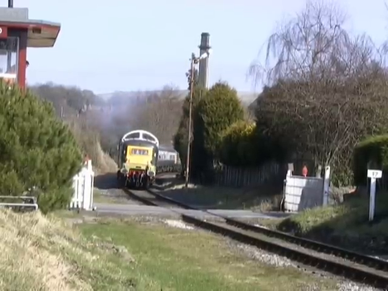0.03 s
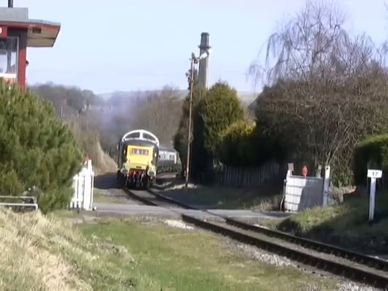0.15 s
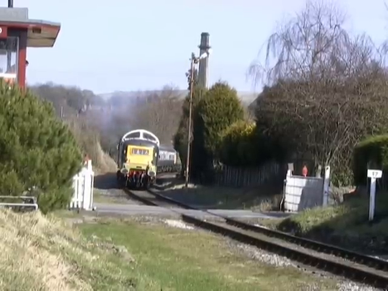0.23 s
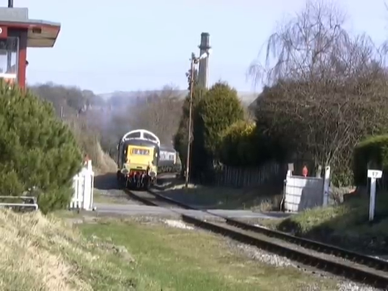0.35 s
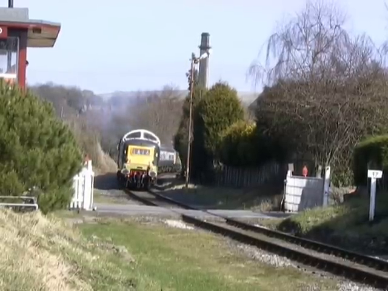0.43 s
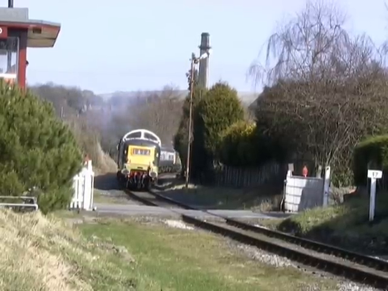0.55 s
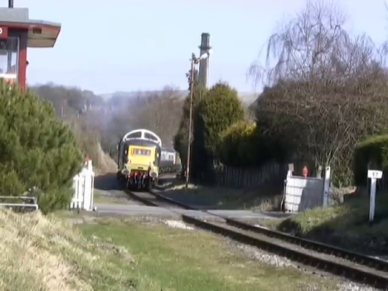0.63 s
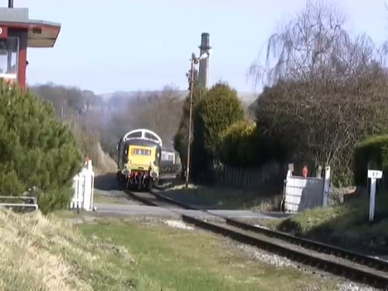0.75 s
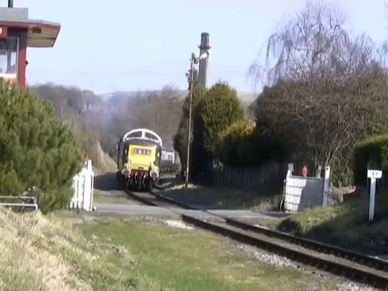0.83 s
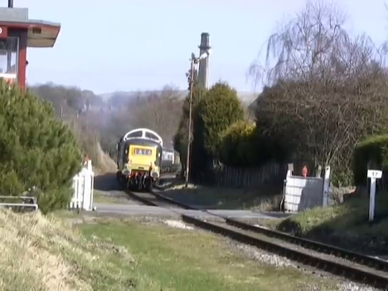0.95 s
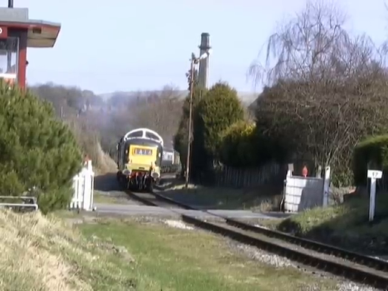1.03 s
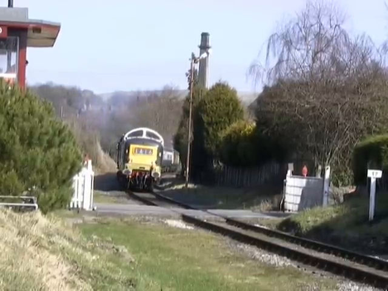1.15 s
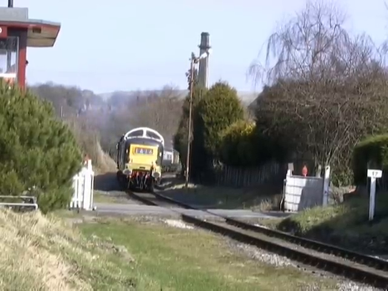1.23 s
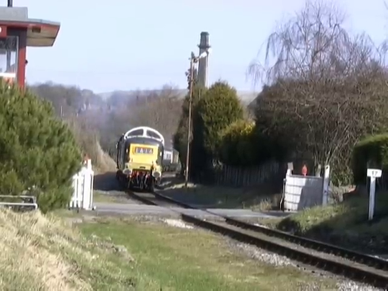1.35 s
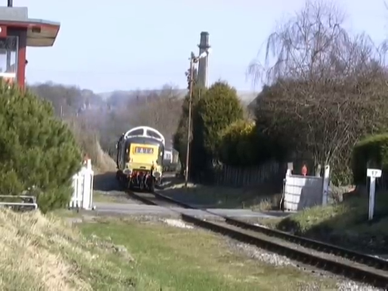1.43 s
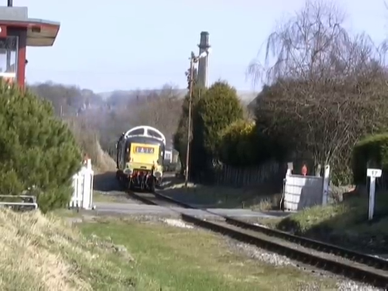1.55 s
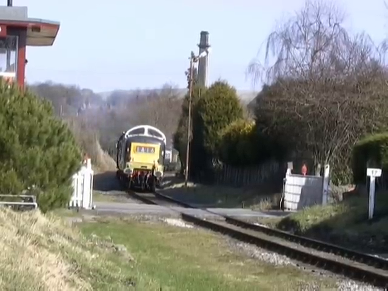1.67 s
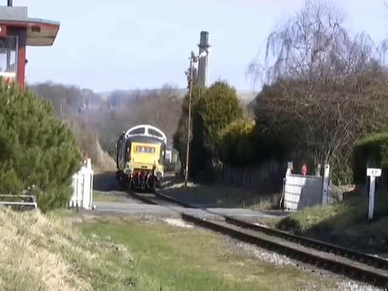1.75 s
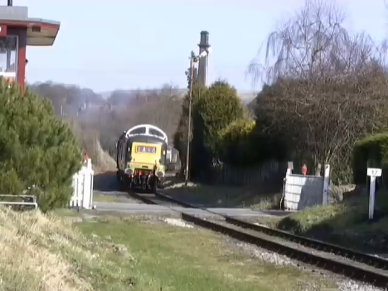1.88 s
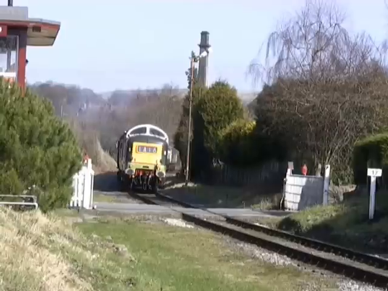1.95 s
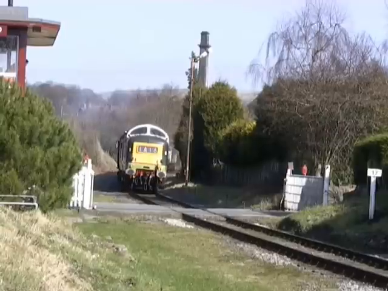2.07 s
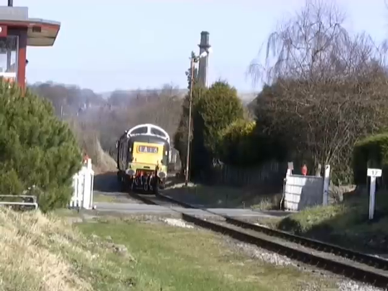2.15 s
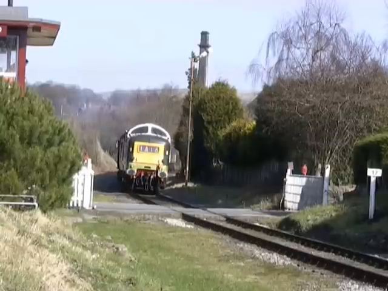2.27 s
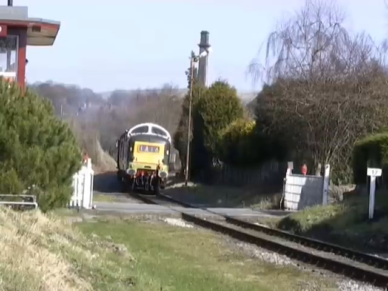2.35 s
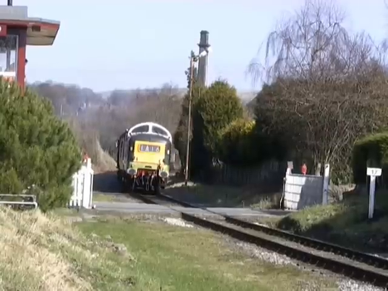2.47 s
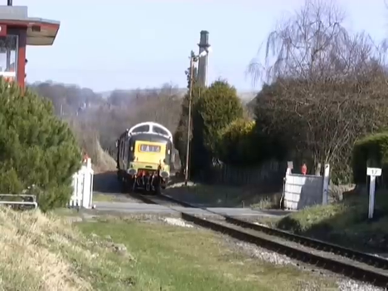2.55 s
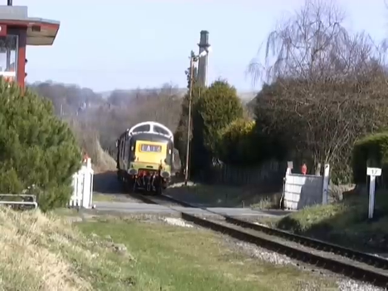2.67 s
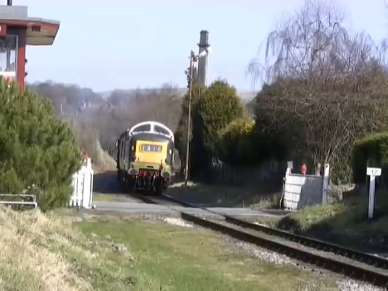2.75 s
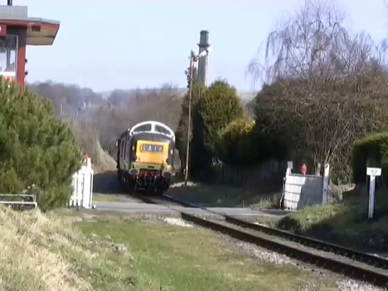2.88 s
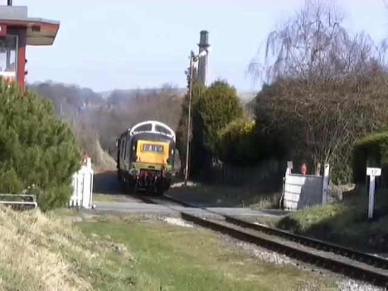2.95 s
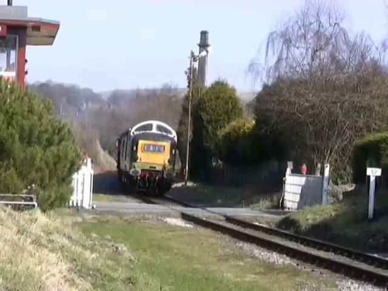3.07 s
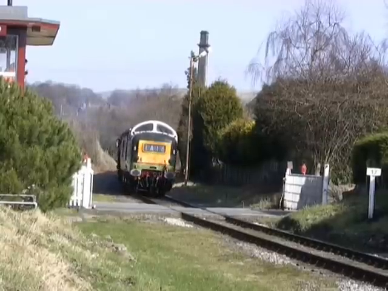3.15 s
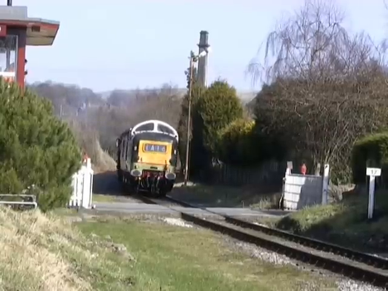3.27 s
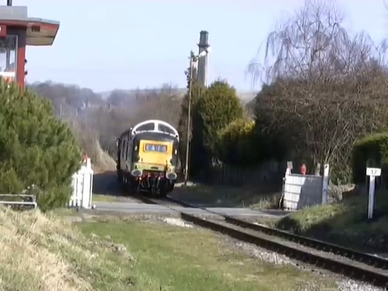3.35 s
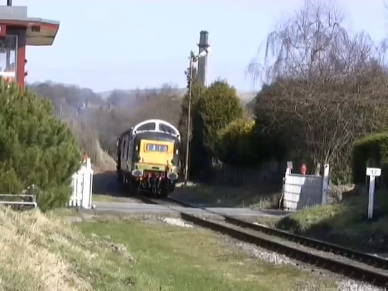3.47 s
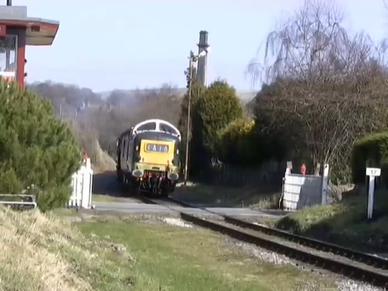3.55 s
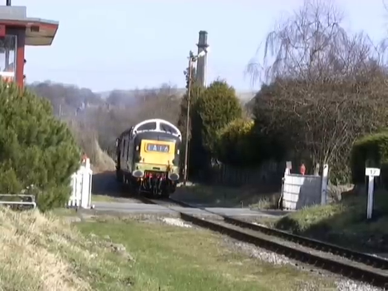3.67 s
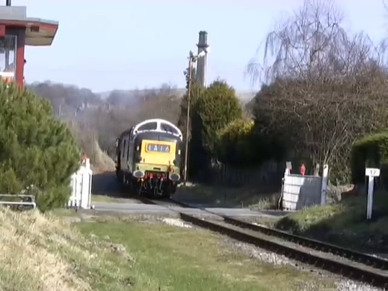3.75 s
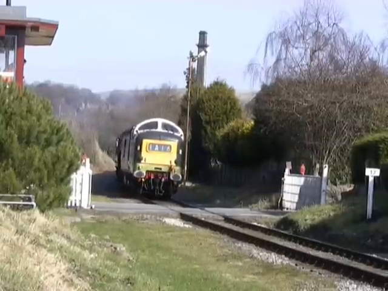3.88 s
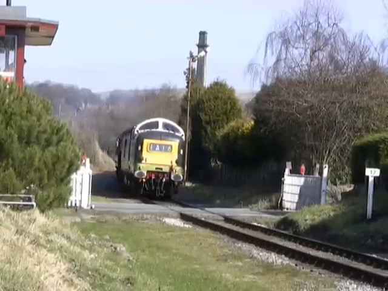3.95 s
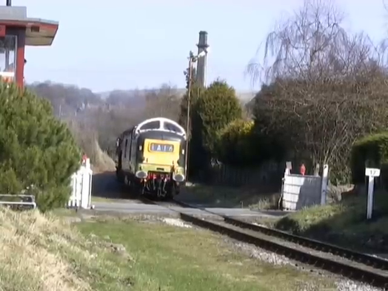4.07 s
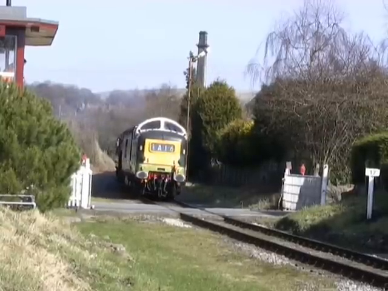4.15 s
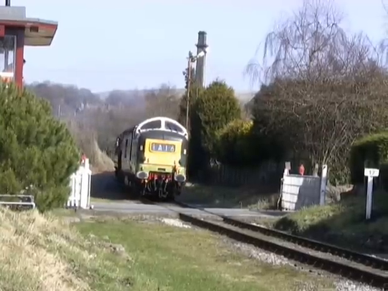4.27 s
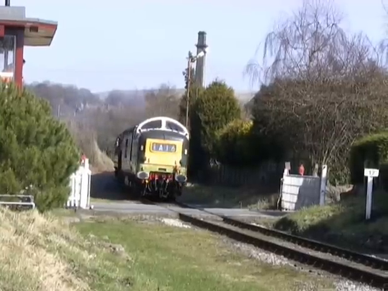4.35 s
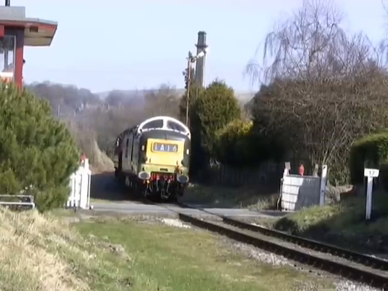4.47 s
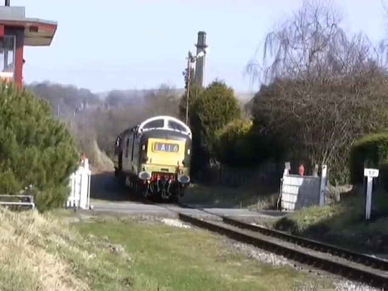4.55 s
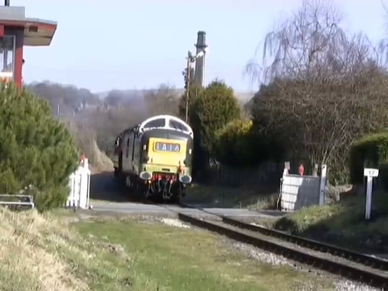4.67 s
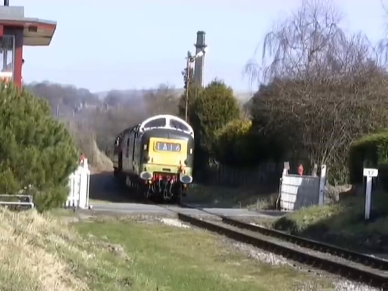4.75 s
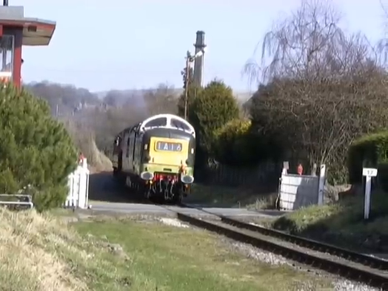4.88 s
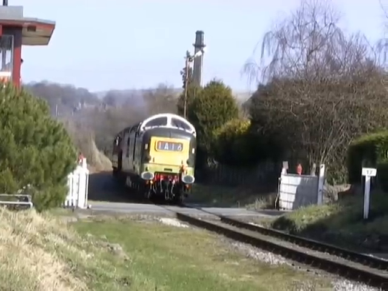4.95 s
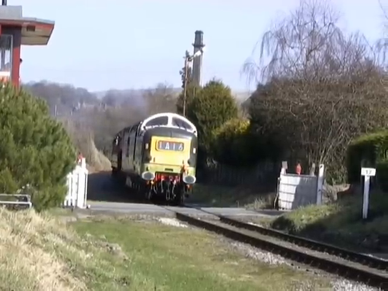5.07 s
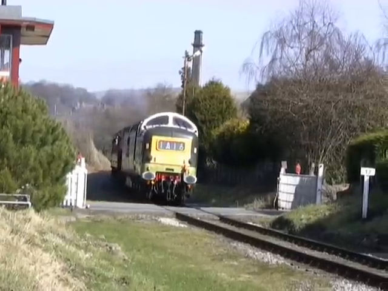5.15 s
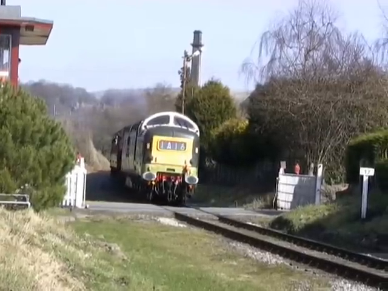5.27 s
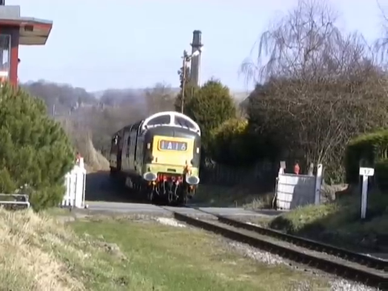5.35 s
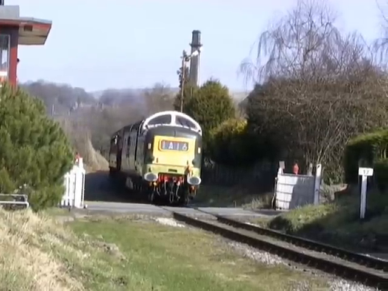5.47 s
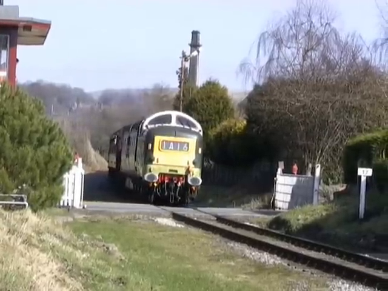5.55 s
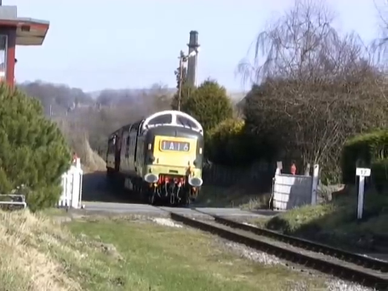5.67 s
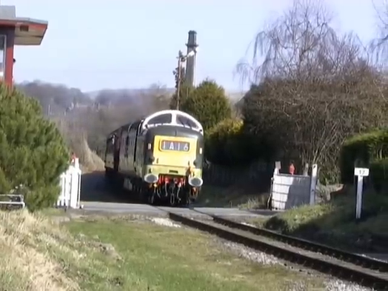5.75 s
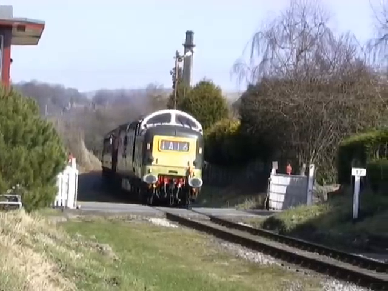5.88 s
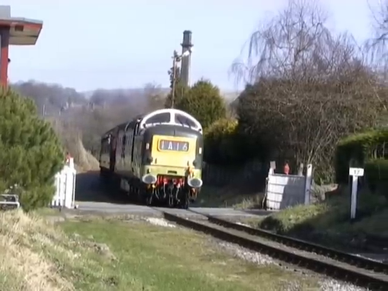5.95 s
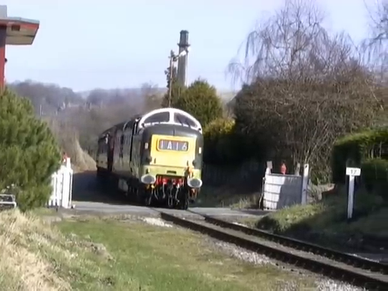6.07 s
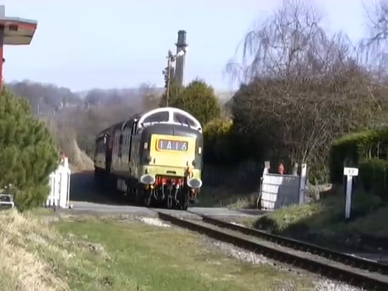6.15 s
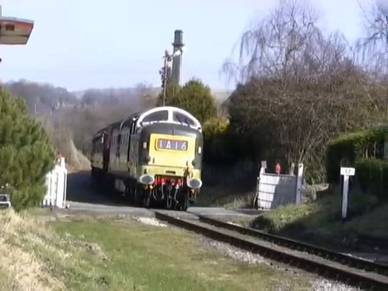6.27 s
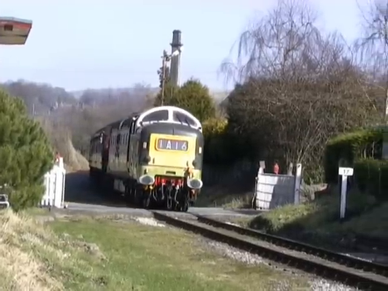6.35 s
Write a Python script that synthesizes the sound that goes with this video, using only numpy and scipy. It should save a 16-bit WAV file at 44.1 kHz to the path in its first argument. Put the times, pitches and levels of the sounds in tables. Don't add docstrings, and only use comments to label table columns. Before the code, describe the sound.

A powerful diesel engine is already running in the distance, revving up gently, then holding steady. Its deep pulsing hum, thick exhaust rumble and high mechanical whine come closer along the track, leaning slightly left. The second half grows much louder and clearer, with short puffs of bright hiss and small dips from moving air. A trackside camera adds faint hiss, high tones and dry little clicks.

```python
import sys
import numpy as np
from scipy import signal
from scipy.fft import rfft, irfft
from scipy.io import wavfile
from scipy.ndimage import uniform_filter1d

SR = 44100
rng = np.random.default_rng(int(sys.argv[2]) if len(sys.argv) > 2 else 0)


def magnitude_from_level(level_db):
    exponent = np.asarray(level_db, float) / 20
    return 10 ** exponent


def to_wav(s):
    ch = np.atleast_2d(s).T
    pcm = np.round(np.clip(ch, -1, 1) * 32767)
    wavfile.write(sys.argv[1], SR, pcm.astype(np.int16))


N = 283122
T = np.arange(N) / SR
BLOWER_RATIO = 9.89 / 3

# time in seconds, nearness in dB, effort in dB.
APPROACH = [(0., .1, 4), (.3, 0.3, 5), (.8, 0.8, 5), (1.4, -1.45, 5), (2.05, -1, 1.4), (2.9, 1.35, 0.3),
            (3.5, 4, -0.5), (4.2, 7, -1.4), (4.8, 9., -0.2), (5.3, 10, 0.5), (6.42, 10.5, 2.2)]
# time in seconds, first crank in Hz, second crank (a hair slower) in Hz.
SPEED = [(0.0, 17.047, 17.032), (0.5, 17.586, 17.494), (1.0, 18.02, 17.923), (1.25, 18.189, 18.081),
         (1.5, 18.283, 18.194), (2.0, 18.357, 18.294), (2.25, 18.295, 18.242), (2.75, 18.118, 18.097),
         (3.1, 18.078, 18.068), (3.5, 18.103, 18.103), (4.0, 18.183, 18.182), (4.5, 18.214, 18.206),
         (5.0, 18.279, 18.249), (5.75, 18.355, 18.324), (6.42, 18.39, 18.36)]


def evened(x):
    return x / np.sqrt(np.mean(x ** 2) + 1e-20)


def columns(rows, t=T):
    s, *values = np.transpose(rows)
    return [np.interp(t, s, v) for v in values]


def read(points, hz):
    f, value = np.transpose(points)
    return np.interp(np.log(hz + 1), np.log(f + 1), value)


def smoothed_noise(shape, across_hz, along_time):
    field = uniform_filter1d(rng.standard_normal(shape), across_hz, axis=0)
    return evened(uniform_filter1d(field, along_time, axis=1))


def drift(per_s, count):
    steps = evened(uniform_filter1d(rng.standard_normal((count, int(30 * per_s) + 8)), 4, axis=1))
    at = np.arange(steps.shape[1]) / (4 * per_s)
    coarse = np.array([np.interp(T[::64], at, row) for row in steps])
    return coarse.repeat(64, axis=1)[:, :N]


def swells(rows, t):
    return sum(db * np.exp(-(2 * (t - s) / length) ** 4) for s, length, db in rows)


def levels(voices):
    t = T[::64]
    near_db, effort_db = columns(APPROACH, t)
    course = [db + a * near_db + b * effort_db + swells(rows, t) for db, a, b, rows in voices]
    return np.array([np.interp(T, t, row) for row in course])


def turns():
    return np.cumsum(columns(SPEED), axis=1) / SR


def throb(wobble_turns=.018):
    throb_voices = [
        (-31.5, 0.83, .01, [(.5, 0.17, -8.5), (1.6, 0.2, 4), (3.7, 0.63, 3.), (6.25, 0.71, -5)]),
        (-28.5, 0.72, -0.36, [(.65, .75, -15), (1.2, .45, -3.5), (2.0, 0.99, 5), (6.0, 0.14, -6)]),
        (-34.5, 0.77, 0.17, [(.5, 0.27, 8.), (2.9, 0.37, 2.5), (5.3, 0.36, -1), (6.4, .6, -7.5)]),
        (-28., .75, 0.071, [(.5, 0.19, -11), (3.2, 0.8, 1.5), (4.65, 0.72, -3)]),
    ]
    flutter_db = np.array([
        [1.5],
        [1.5],
        [.9],
        [.9],
    ])
    null_s = 3.705
    first = turns()[0]
    crank = first - np.interp(null_s, T, first)
    order = np.array([7, 9, 10, 3 * BLOWER_RATIO])[:, None]
    start = np.array([0, 0, 0, .5])[:, None] + rng.random((4, 1)) * [[1], [1], [0], [0]]
    level = magnitude_from_level(levels(throb_voices) + [[0], [0], [1.5], [0]] + flutter_db * drift(9., count=4))
    phase = order * crank + start + wobble_turns * drift(4.6, count=4)
    return np.sqrt(2) * (level * np.sin(2 * np.pi * phase)).sum(0)


def drone(flutter_db=1.5):
    pipe_voices = [
        (-42.5, 0.17, 0.37, [(1.72, .35, 8.5), (2.5, .3, 8), (4.05, .4, -3), (5.3, 0.59, 0), (6.25, .25, -6)]),
        (-45, 0.25, .3, [(.15, 0.91, 4.4), (.8, 0.57, 9.2), (3.58, .15, 9.1), (4.23, .38, 10.6), (5.22, 0.28, 11.5), (5.76, 0.15, 10.), (6.08, 0.31, 14)]),
        (-51, .3, 1.33, [(.95, 0.64, 2.2), (5.8, .3, 6.3)]),
        (-59.5, 1.06, .6, [(.76, .5, 17.8), (1.2, 0.34, 11.5), (1.75, .3, 7.), (5.45, .5, 3.95)]),
    ]
    # crank order, level against its voice in dB.
    clusters = [
        [(25, 0)],
        [(27, 0)],
        [(33, 0), (34, 3), (35, 3), (45, 2), (46, 2), (47, -1)],
        [(55, 3), (56, -3)],
    ]
    crank, out = turns()[1], np.zeros(N)
    for cluster, db in zip(clusters, levels(pipe_voices)):
        k, offset_db = np.transpose(cluster)[:, :, None]
        level = np.sqrt(2) * magnitude_from_level(db + offset_db + flutter_db * drift(2.4, count=len(k)))
        phase = k * crank + rng.random(k.shape)
        out += (level * np.sin(2 * np.pi * phase)).sum(0)
    return out


def resonate(x, hz, width):
    turn = np.exp(2j * np.pi * np.cumsum(hz) / SR)
    r = np.exp(-np.pi * width / SR)
    return 2 * (turn * signal.lfilter([(1 - r) ** 2], [1, -2 * r, r * r], x / turn)).real


def whines(steady=.32):
    whine_voices = [
        (-44.5, 0.72, .01, [(.2, 0.96, -7.), (1.32, 0.28, 6.5), (2.5, 0.6, 4.5), (3.1, 0.36, 4.), (3.95, .5, -7.5), (5.0, .15, 4), (5.79, 0.16, 2.5)]),
        (-54., 1.04, .01, [(3.25, 0.33, 2), (4.03, .45, 7), (5.06, .12, -8), (5.8, .1, -8)]),
        (-52, 0.55, .01, [(.2, 0.36, 7.5), (.58, .3, 6), (1.38, .3, 3), (1.8, 0.22, -12.), (1.97, .1, 5), (4.6, 0.2, 6), (4.8, .15, -8), (6.1, 0.26, 6)]),
        (-62, 1.35, .01, [(.2, .6, 8.), (4.3, .2, 7), (4.66, 0.1, 10), (4.87, .18, 9), (5.36, 0.14, 9.5), (5.99, 0.084, -9.), (6.2, .2, 12)]),
    ]
    # time in seconds, frequency in Hz.
    whine_hz = [(0., 1919), (1.2, 1950), (1.36, 1973), (2.2, 1985), (2.3, 2048), (3.1, 1965), (4.2, 1937),
                (5.0, 1983), (6.42, 1985)]
    gear_orders = [
        73.25,
        80.,
    ]
    speed = columns(SPEED)[0]
    low_db, high_db, *gear_db = levels(whine_voices)
    # frequency in Hz, bandwidth in Hz, level in dB.
    voices = [(columns(whine_hz)[0], 90., low_db - 2.5), (125.6 * speed, 45., high_db - 2.0)]
    voices += [(k * speed, 25., db + 0.5) for k, db in zip(gear_orders, gear_db)]
    out = np.zeros(N)
    for (f, width, db), wander in zip(voices, drift(12., count=len(voices))):
        tone = np.sqrt(2) * np.sin(2 * np.pi * np.cumsum(f + width / 4 * wander) / SR)
        fuzz = evened(resonate(rng.standard_normal(N), f, width))
        out += magnitude_from_level(db) * (np.sqrt(steady) * tone + np.sqrt(1 - steady) * fuzz)
    return out


def weak_orders(rows, crank, fading_db=3., wobble_turns=.002):
    k, db = np.transpose(rows)[:, :, None]
    fade, blur = drift(2., count=len(rows)), drift(3., count=len(rows))
    phase = k * (crank + wobble_turns * blur) + rng.random(k.shape)
    return (magnitude_from_level(db - 38.5 + fading_db * fade) * np.sin(2 * np.pi * phase)).sum(0)


def roar(patchy_db=1., gust_db=.4):
    # order of the first crank, level over the roar in dB.
    first_rows = [(2, 12), (3, 7), (5, 8), (6, 5), (8, 10), (12, 11), (13, 13), (15, 11), (16, 11),
                  (17, 10), (18, 9), (19, 11), (20, 7), (21, 8)]
    # order of the blower shaft, level over the roar in dB.
    blower_rows = [(5, 15), (6, 8), (9, 10), (10, 7), (12, 10)]
    # order of the second crank, level over the roar in dB.
    second_rows = [(24, 8), (26, 9), (30, 5), (31, 6), (32, 6), (39, 5), (41, 4), (42, 7), (44, 5), (48, 6),
                   (54, 5)]
    # frequency in Hz, density in dB per Hz.
    roar_spectrum = [(30, -43), (60, -15.5), (100, -12.5), (170, -9.5), (260, -16.5), (480, -18),
                     (700, -21), (900, -22), (1150, -27.5), (1750, -31), (2350, -33.5), (2700, -40.5),
                     (4000, -47), (7000, -58), (12000, -76.5)]
    # frequency in Hz, left-right likeness from 0 to 1.
    likeness = [(60, 0.13), (100, 0.8), (180, 0.85), (300, 0.91), (520, 0.95), (890, 0.93), (1520, 0.95),
                (2600, 0.84), (5000, 0.61), (9000, 0.59)]
    band_hz = [300, 700, 1700, 4200, 9000, 12500]
    air_gain = [1.39, .15]
    shares = [
        (.45, -0.3, .55, .01),
        (.45, 1.06, 1.3, .01),
        (0.901, 0.34, .8, .2),
        (1.01, 0.39, 0.35, 1.01),
    ]
    # centre in seconds, length in seconds, gain in dB.
    gust_rows = [
        (3.45, .08, 1.5),
        (4.25, .1, 1),
        (4.6, 0.28, -1),
        (4.85, .2, 1),
        (5.33, .1, 1),
        (5.48, 0.18, -2.5),
        (5.8, 0.14, 0.5),
        (6.0, 0.11, -4),
        (6.2, .1, 0),
    ]
    # centre in seconds, length in seconds, gain in dB.
    puff_rows = [(3.44, .07, 2.5), (3.7, .1, 1.5), (4.18, .12, 1), (4.9, .32, 1.5), (5.8, 0.23, 3.5),
                 (5.87, 0.1, 1)]
    first, second = turns()
    blower = [(k * BLOWER_RATIO, db) for k, db in blower_rows]
    lines = weak_orders(first_rows + blower, first) + weak_orders(second_rows, second)
    uneven = 1 + 0.048 * np.cos(2 * np.pi * first)
    sources = [lines + uneven * rng.standard_normal(N), rng.standard_normal(N)]
    hz, t, (near, diffuse) = signal.stft(sources, SR, nperseg=1024, noverlap=768)
    swell = np.array(shares) @ [*columns(APPROACH, t), swells(gust_rows, t), swells(puff_rows, t)]
    swell -= swell.mean(1, keepdims=True)
    swell = np.vstack([swell, np.outer(air_gain, swell[-1])])
    field = np.array([np.interp(np.log(hz + 1), np.log(band_hz), frame) for frame in swell.T]).T
    field += patchy_db * smoothed_noise(field.shape, 10, 12)
    field += gust_db * smoothed_noise(field.shape, 120, 4) * (hz[:, None] > 2500)
    colour = magnitude_from_level(read(roar_spectrum, hz)[:, None] + field)
    same = np.clip(read(likeness, hz), 0, 1)[:, None]
    mid, side = np.sqrt((1 + same) / 2) * near, np.sqrt((1 - same) / 2) * diffuse
    pair = signal.istft(colour * [mid + side, mid - side], SR, nperseg=1024, noverlap=768)[1][:, :N]
    return magnitude_from_level(-23) * evened(pair)


def wind(low_hz=38.5, top_hz=79.4, opposed=0.33):
    wind_voice = [
        (-47., .01, -1.5, [(.65, .35, -9.), (1.4, .3, 7), (2.2, 0.36, 13), (2.75, 0.44, 9), (3.9, .8, 5.5), (4.3, .15, 5), (5.0, .25, 8.), (5.15, 1.05, 3)]),
    ]
    band = signal.butter(2, [low_hz, top_hz], "band", fs=SR, output="sos")
    a, b = signal.sosfilt(band, rng.standard_normal((2, N)))
    pair = evened(np.array([a - opposed * b, b - opposed * a]))
    return magnitude_from_level(levels(wind_voice)[0] + 7.0) * pair * magnitude_from_level([[1.2], [-1.2]])


def hiss(same=-0.3):
    # frequency in Hz, density in dB per Hz.
    hiss_spectrum = [(2500, -1), (4000, -14), (5200, -15.5), (6100, -5.5), (7000, -14), (8400, -12),
                     (9400, -8), (10000, -13), (10700, -8), (11600, -20), (12500, -19.5), (13500, -28.5),
                     (14500, -47)]
    a, b = rng.standard_normal((2, N))
    pair = np.array([a, same * a + np.sqrt(1 - same ** 2) * b])
    colour = magnitude_from_level(read(hiss_spectrum, np.fft.rfftfreq(N, 1 / SR)))
    return magnitude_from_level(-55.5) * evened(irfft(rfft(pair) * colour, N))


def drive_tones():
    # frequency in Hz, level in dB.
    tones = [(5997, -78), (6202, -82.0), (6298, -81.5), (6600, -87.5), (8856, -89.0), (9302, -85.5),
             (10201, -89), (10471, -85.5), (10648, -91.5), (10799, -87.0), (11100, -99), (11289, -91.5),
             (11999, -91.0), (12500, -98.0), (12602, -99.5)]
    out = np.zeros((2, N))
    for (hz, db), waver in zip(tones, drift(8., count=len(tones))):
        phase = hz * T + rng.random() + np.array([[0], [.33]])
        out += magnitude_from_level(db + 5. + 3. * waver) * np.sin(2 * np.pi * phase)
    return out


def ticks(tick_hz=8000., decay_s=.00012):
    # time in seconds, peak level in dB.
    tick_rows = [(1.6023, -44), (1.7699, -49.5), (1.8839, -45), (2.146, -47.5), (2.2626, -51.5),
                 (2.5343, -44.5), (2.7119, -49.5), (3.6714, -54.5), (4.1631, -44.5), (4.8224, -46.5),
                 (4.9626, -46), (5.1804, -42.5), (5.3083, -46), (5.8506, -40.5)]
    t = np.arange(-40, 90) / SR
    out = np.zeros((2, N))
    for (s, db), (skew, tune) in zip(tick_rows, rng.random((len(tick_rows), 2))):
        phase = tick_hz * (.85 + .3 * tune) * t + np.array([[0], [0.22 + skew / 8]])
        tick = np.cos(2 * np.pi * phase) * np.exp(-abs(t) / decay_s)
        i = round(s * SR)
        out[:, i:i + len(t)] += magnitude_from_level(db + 11.5) * tick
    return out


def scene():
    # frequency in Hz, left minus right in dB.
    lean_rows = [(60, 3), (130, 3), (270, 2.5), (580, 2.0), (1220, 2), (2600, 1)]
    train = throb() + drone() + whines() + roar()
    lean = magnitude_from_level(read(lean_rows, np.fft.rfftfreq(N, 1 / SR)) / 2)
    return irfft(rfft(train) * [lean, 1 / lean], N) + wind() + hiss() + drive_tones() + ticks()


def band_limit(x):
    return signal.sosfilt(signal.butter(12, 14750, fs=SR, output="sos"), x)


def record(dry):
    start = np.minimum(T / .00012, 1)
    return band_limit(start * dry + .0028)


dry = scene()
out = record(dry)
to_wav(out)
```